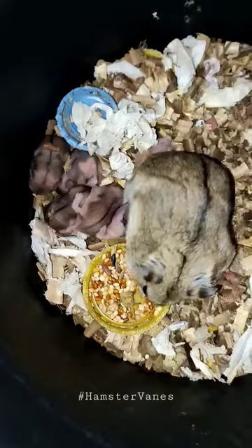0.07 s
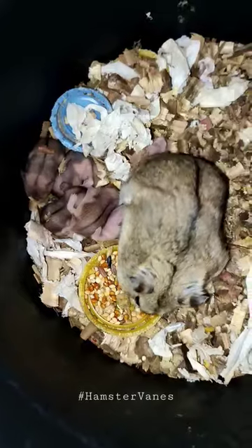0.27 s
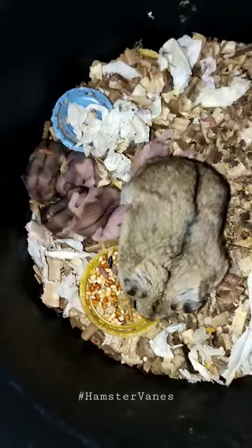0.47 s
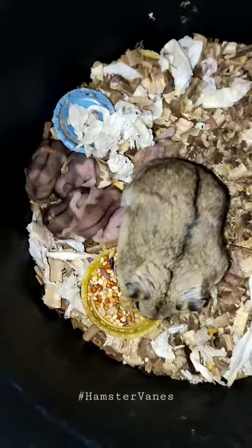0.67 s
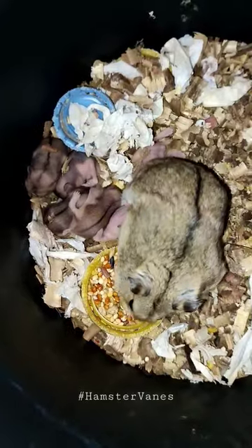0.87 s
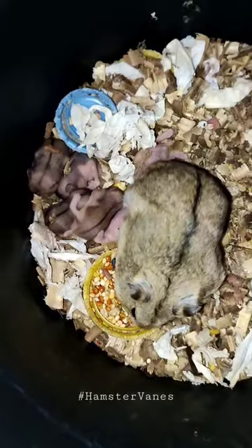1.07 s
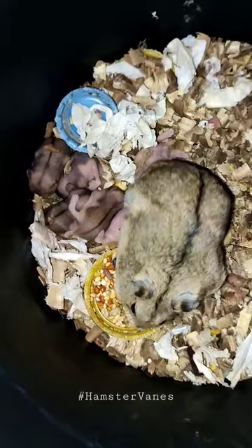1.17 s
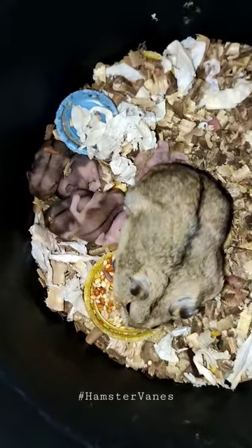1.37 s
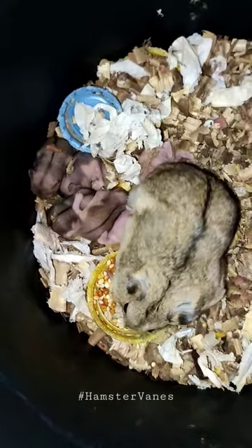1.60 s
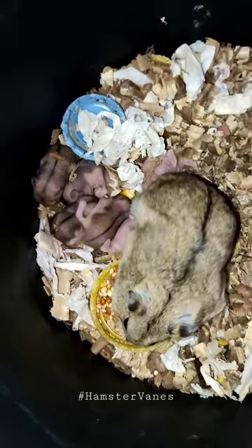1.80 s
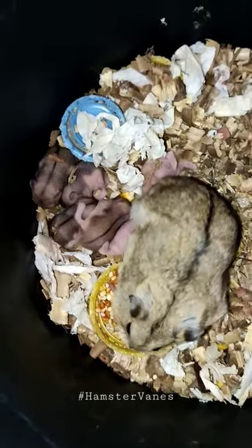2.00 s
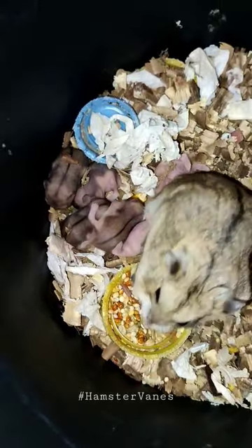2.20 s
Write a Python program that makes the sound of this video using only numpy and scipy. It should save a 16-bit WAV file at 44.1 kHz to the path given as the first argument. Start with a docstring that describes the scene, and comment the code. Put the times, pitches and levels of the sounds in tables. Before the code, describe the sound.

A hamster nibbles seeds in a small plastic dish, making a few faint, sharp clicks close to the microphone. Wood shavings rustle softly and its tub bumps lightly, over a steady low hum and hiss in a quiet room.

```python
"""A quiet room, a phone's two microphones close to a hamster nosing seeds in a small plastic dish.
The input wakes just after the start: it fades up with three small ticks while its offset settles,
opening on mains hum, a slow motor, a deep drone and hiss. From half a second in, wood shavings rustle
faintly; then seeds crack and ping the dish, and the tub takes three soft bumps.
More rustling follows, and one last seed clicks just before the end."""
import sys
import numpy as np
from scipy import signal
from scipy.fft import rfft, irfft
from scipy.io import wavfile
from scipy.ndimage import uniform_filter1d

SR = 44100
rng = np.random.default_rng(int(sys.argv[2]) if len(sys.argv) > 2 else 0)


def materialize(psi):
    """Save the field psi as 16-bit PCM at rate SR to the path in sys.argv[1].

    A 1-D psi becomes a single channel; in a 2-D psi each row is a channel.
    """
    bounded = np.clip(np.atleast_2d(psi).T, -1, 1)
    quanta = np.round(bounded * 32767).astype(np.int16)
    wavfile.write(sys.argv[1], SR, quanta)


N = 99225
T = np.arange(N) / SR

# Seeds, close up. Each row: start in seconds, crack level in dB, tilt in dB per octave,
# left minus right in dB, decay in seconds, ring level in dB.
SEED_CLICKS = [(0.7207, -45.5, -3.5, -3, 0.0047, -68), (0.7435, -63, -1, -7, 0.0018, -71),
               (1.011, -35, .5, 8, 0.0011, -34), (1.0477, -57, -1, 12, 0.0047, -74),
               (1.0914, -44, -7, -3, 0.0027, -53), (1.3388, -40, -1.3, 2, 0.0021, -46),
               (2.1908, -52, -4.5, 3, 0.0045, -53)]
# Modes of the dish. Each row: frequency in Hz, dB added to the ring level, decay in seconds.
DISH_MODES = [(2900, -11.5, 0.0012), (4870, -18, .001), (7900, -18, 0.00079), (8520, -4, 0.00064),
              (13000, -18, 0.00065)]
# Movements in the shavings. Each row: centre in seconds, half length in seconds, level in dB.
RUSTLE_SWELLS = [(0.576, 0.11, -67), (0.748, 0.062, -61), (1.052, 0.043, -63), (1.39, 0.068, -70),
                 (1.513, 0.057, -65.5), (1.608, 0.054, -63.5), (2.0, 0.056, -68.5), (2.172, 0.033, -64.5)]
# Bumps of the tub and ticks of the waking input. Each row: start in seconds, drive level in dB.
TUB_BUMPS = [(0.701, -54.5), (1.12, -58.5), (1.309, -48)]
INPUT_TICKS = [(.2318, -42.5), (0.2923, -40.5), (0.3515, -40)]
# Overtones of the mains. Each row: frequency in Hz, level in dB, waver in dB.
HUM_OVERTONES = [(300.6, -82.5, -8), (904.6, -78, 5)]
# Lines of the motor. Each row: multiple of the shaft rate, level in dB.
MOTOR_LINES = [(4, -58), (5, -61), (7, -58), (9, -73), (10, -71), (11, -76), (12, -80.5), (15, -82)]
# Swells of the slow beat at the hum's octave, and of the drone. Each row: time in seconds, level in dB before
# trim.
OCTAVE_SWELLS = [(0.35, -51.5), (0.482, -60.5), (0.99, -51.5), (1.36, -63), (1.752, -49.5), (1.936, -68),
                 (1.98, -50.5), (2.084, -70.5), (2.25, -52.5)]
DRONE_SWELLS = [(0.3, -40.5), (0.418, -45.5), (0.456, -52), (0.522, -47), (0.718, -53), (0.744, -41.5),
                (1.212, -50.5), (1.244, -62), (1.276, -46), (1.522, -64), (1.542, -43.5), (1.798, -42),
                (1.848, -76), (1.928, -44), (2.07, -61), (2.096, -49), (2.222, -45), (2.25, -41)]
# The spectrum of each sound. Each row: frequency in Hz, relative level in dB.
CRACK_SPECTRUM = [(300, -17), (1000, -4.5), (1800, -8), (2800, 1.5), (3800, -4), (5000, 3), (6100, -0.5),
                  (7200, -1.5), (8400, -2.5), (9800, -6.5), (11000, -2.5), (13000, -3.5), (15000, 1)]
RUSTLE_SPECTRUM = [(500, 0), (1500, -12), (2300, 9), (2850, 10), (3400, -2.5), (4600, -0.5), (5400, 3),
                   (6200, -12), (8500, -10), (14000, -24.5)]
TUB_SPECTRUM = [(150, -41.5), (260, -8.5), (315, 5), (400, 1), (470, -13.5), (700, -15), (1150, -17),
                (2000, -37)]
RUMBLE_SPECTRUM = [(20, -3.5), (38, 5), (58, 4.5), (80, 2.5), (115, -1.5), (155, 0.5), (185, -15.5),
                   (250, -6), (290, -29), (360, -20), (470, -31.5), (900, -26.5), (2000, -57.5)]
AIR_SPECTRUM = [(100, 11.5), (300, 9.5), (480, -2), (900, 2.5), (1200, -0.5), (2000, 0.5), (2400, -3),
                (2800, -2), (3200, -8), (4200, -11), (5400, -13), (6500, -17), (8500, -24.5),
                (10000, -24.5), (14000, -23)]
TICK_SPECTRUM = [(100, 8), (700, -1), (2000, -9.5), (5500, -2.5), (8000, -9), (14000, -11.5)]
# Balance of the two microphone ports. Each row: frequency in Hz, left minus right in dB.
PORT_BALANCE = [(250, 2), (450, -4.5), (750, -0.5), (1300, -5.5), (2100, -8), (2900, -2.5), (4300, -3.5),
                (5400, -6.5), (6500, 2), (8400, 9), (9500, 1), (14000, -1)]


def seeds(tail_db=-18, tail_s=0.01):
    """Close to the phone, each seed cracks, pings the dish and echoes faintly in the tub."""
    out = 0
    for start, db, tilt_db, pan_db, decay, ring_db in SEED_CLICKS:
        crack, tail = rng.standard_normal((2, 2, N))
        hit = crack * fall(start, decay) * pan(pan_db) + undb(tail_db) * tail * fall(start, tail_s)
        ring = sum(undb(ring_db + mode_db) * fall(start, mode_s) * np.sin(2 * np.pi * hz * (T - start))
                   for hz, mode_db, mode_s in DISH_MODES)
        out = out + undb(db) * colour(hit, CRACK_SPECTRUM, tilt_db) + ring * pan(pan_db)
    return out


def shavings(grains_per_s=1700, spread_db=0.5):
    """Wood shavings near the microphones: dense tiny grains swell with each small movement."""
    grains = (rng.random((2, N)) < grains_per_s / SR) * rng.standard_normal((2, N))
    grains *= undb(-spread_db * rng.standard_normal((2, N)))
    effort = sum(undb(db) * np.exp(-((T - centre) / half) ** 2) for centre, half, db in RUSTLE_SWELLS)
    return colour(unit(grains) * effort, RUSTLE_SPECTRUM)


def tub(attack_s=0.017, decay_s=0.056):
    """Shifting weight excites the hollow of the tub, alike at both microphones."""
    push = 0
    for start, db in TUB_BUMPS:
        rise = np.clip((T - start) / attack_s, 0, 1)
        push += undb(db) * rise * np.exp(-np.maximum(T - start - attack_s, 0) / decay_s)
    return push * colour(rng.standard_normal(N), TUB_SPECTRUM)


def mains_hum(hum_hz=100.1, hum_db=-42.5, waver_db=0.5, octave_trim_db=0.5):
    """The mains hums in the room; its overtones waver, and near its octave a slow beat swells and sinks."""
    hum = tone(hum_hz) * undb(hum_db + waver_db * walk(10.07))
    overtones = sum(tone(hz) * undb(db + waver * walk(6.4)) for hz, db, waver in HUM_OVERTONES)
    octave = tone(2 * hum_hz) * undb(octave_trim_db + contour(OCTAVE_SWELLS))
    return hum + overtones + octave


def motor(shaft_hz=32.98, waver_db=3.5):
    """A slow motor in the background sounds wavering multiples of its shaft rate."""
    return sum(tone(k * shaft_hz) * undb(db + waver_db * walk(6.67)) for k, db in MOTOR_LINES)


def drone(hz=64.5, wander_hz=4.1, trim_db=-3):
    """A deep tone in the room wanders in pitch and dips in level."""
    return tone(hz + wander_hz * walk(12)) * undb(trim_db + contour(DRONE_SWELLS))


def rumble(db=-51):
    """Low room noise, the same wave at both microphones."""
    return undb(db) * unit(colour(rng.standard_normal(N), RUMBLE_SPECTRUM))


def air(db=-54.5, waver_db=0.71):
    """Smooth room hiss, unrelated left and right."""
    return unit(colour(rng.standard_normal((2, N)), AIR_SPECTRUM)) * undb(db + waver_db * walk(8.34))


def ports(x):
    """Each microphone port favours its own bands."""
    hz, db = np.array(PORT_BALANCE, float).T
    bin_hz = np.maximum(np.arange(N + 1) * SR / (2 * N), 1)
    balance_db = np.interp(np.log(bin_hz), np.log(hz), db)
    return irfft(rfft(x, 2 * N) * pan(balance_db))[:, :N]


def colour(x, points, tilt_db=0, pivot_hz=5000):
    """Causal filter through (Hz, dB) points, tilted by tilt_db per octave, with unit power gain."""
    hz, db = np.array(points, float).T
    octaves = np.log2(np.maximum(np.arange(N + 1) * SR / (2 * N), 1))
    tilt = tilt_db * (np.maximum(octaves, np.log2(hz[0])) - np.log2(pivot_hz))
    gain = unit(undb(np.interp(octaves, np.log2(hz), db) + tilt))
    cepstrum = irfft(np.log(gain))
    cepstrum[1:N] *= 2  # fold to minimum phase
    cepstrum[N + 1:] = 0
    return irfft(rfft(x, 2 * N) * np.exp(rfft(cepstrum)))[..., :N]


def undb(db):
    """Decibels to gain."""
    return 10 ** (np.asarray(db) / 20)


def unit(x):
    """Scale to rms 1."""
    return x / np.sqrt(np.mean(x ** 2))


def pan(db):
    """Left and right gains for a level difference."""
    return undb(np.array([[1], [-1]]) * db / 2)


def walk(rate_hz):
    """Smooth random drift with a spread near 1."""
    hold = int(SR / rate_hz)
    steps = np.repeat(rng.standard_normal(N // hold + 1), hold)
    return 1.3 * uniform_filter1d(uniform_filter1d(steps, hold), hold)[:N]


def contour(points):
    """Straight lines through (seconds, value) points."""
    return np.interp(T, *np.array(points).T)


def fall(start, decay):
    """Exponential decay from a moment on."""
    return (T >= start) * np.exp(-np.maximum(T - start, 0) / decay)


def tone(hz):
    """A sine of rms 1, steady or gliding."""
    return np.sqrt(2) * np.sin(2 * np.pi * (np.cumsum(hz * np.ones(N)) / SR + rng.random()))


def scene():
    """The hamster up close and the room behind it, as the two ports hear them."""
    room = (mains_hum() + motor() + drone() + rumble()) * pan(db=0.9)
    return room + tub() + ports(seeds() + shavings() + air())


def record(dry):
    """The phone's input fades up with small ticks and a settling offset; the top is cut."""
    wake_s, rise_s, top_hz = 0.16, 0.25, 14100
    offset_db, offset_hz, settle_s = -12.5, 0.73, 0.19
    tick_s, rebound_s = 0.00016, 0.0016
    awake = np.maximum(T - wake_s, 0)
    fade = np.minimum(awake / rise_s, 1) ** 0.8
    offset = undb(offset_db) * np.exp(-awake / settle_s) * np.sin(2 * np.pi * offset_hz * awake)
    # Each tick is a sharp dip with a weaker, slower rebound.
    ticks = sum(undb(db) * (0.2 * fall(start + 2 * tick_s, rebound_s) - fall(start, tick_s))
                for start, db in INPUT_TICKS)
    mix = fade * (dry + offset * pan(db=-3.7)) + colour(ticks, TICK_SPECTRUM) * pan(db=-3)
    return signal.sosfilt(signal.ellip(8, 0.2, 70, top_hz, fs=SR, output="sos"), mix)


dry = scene()
out = record(dry)
materialize(out)
```